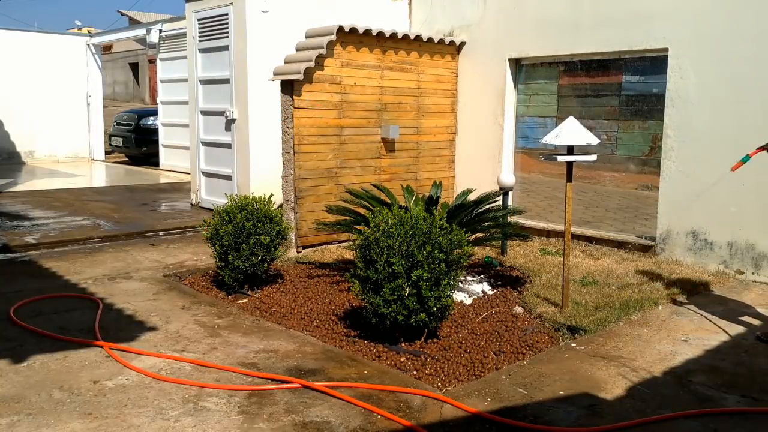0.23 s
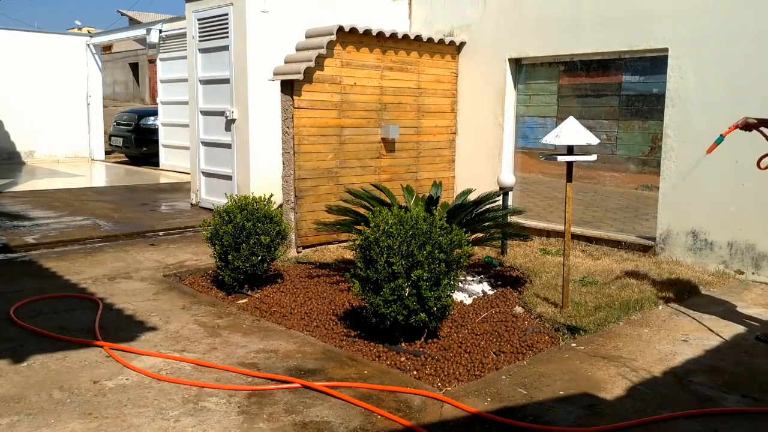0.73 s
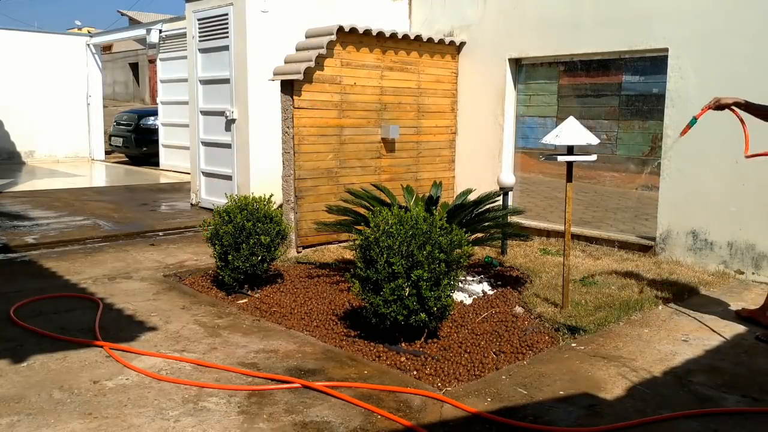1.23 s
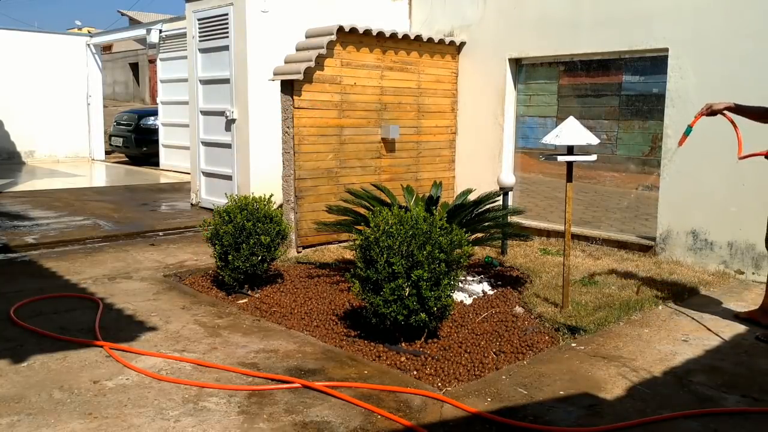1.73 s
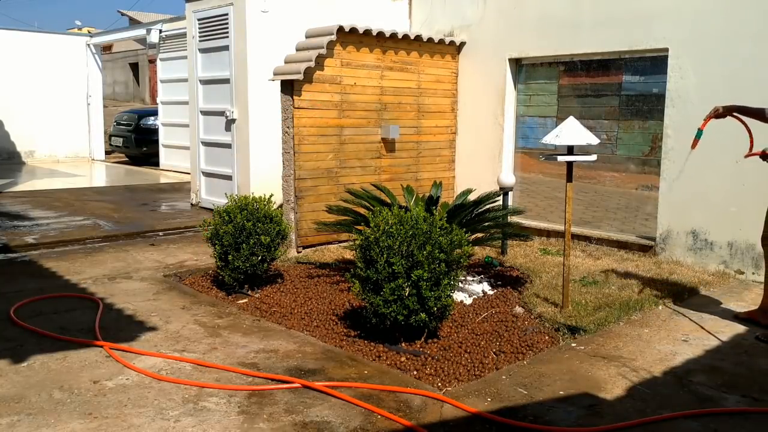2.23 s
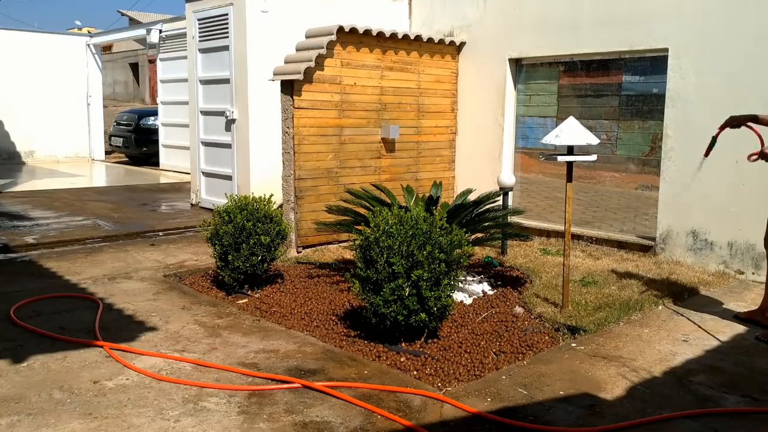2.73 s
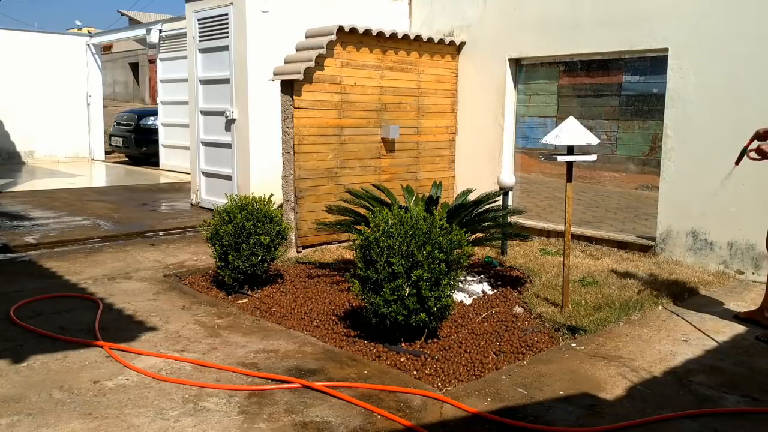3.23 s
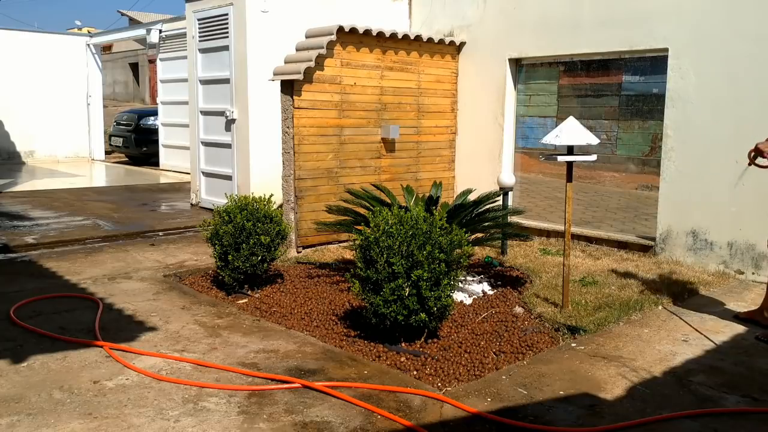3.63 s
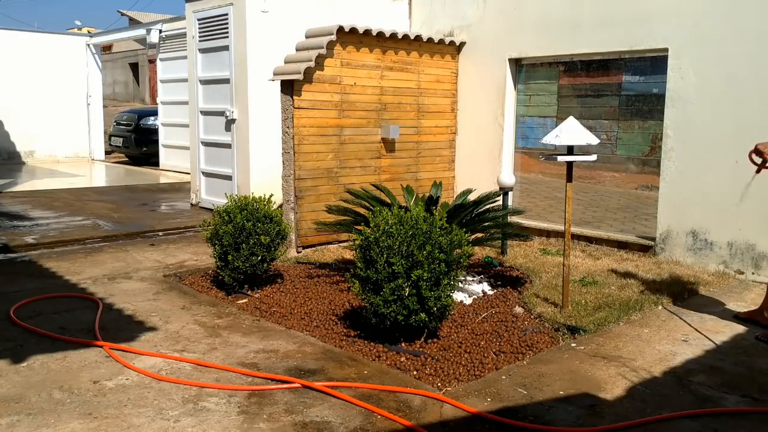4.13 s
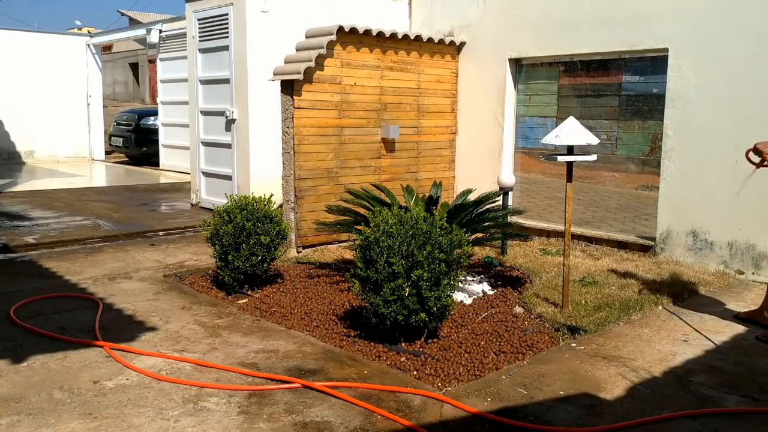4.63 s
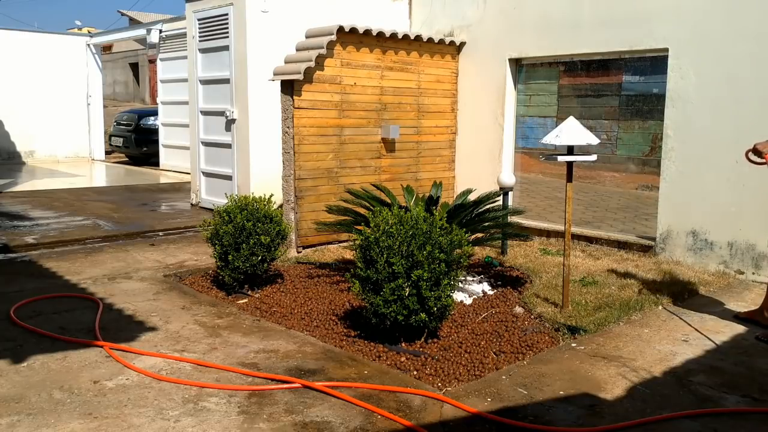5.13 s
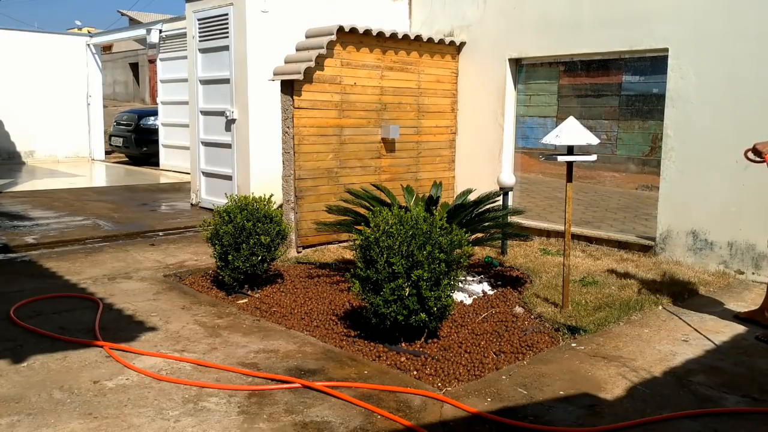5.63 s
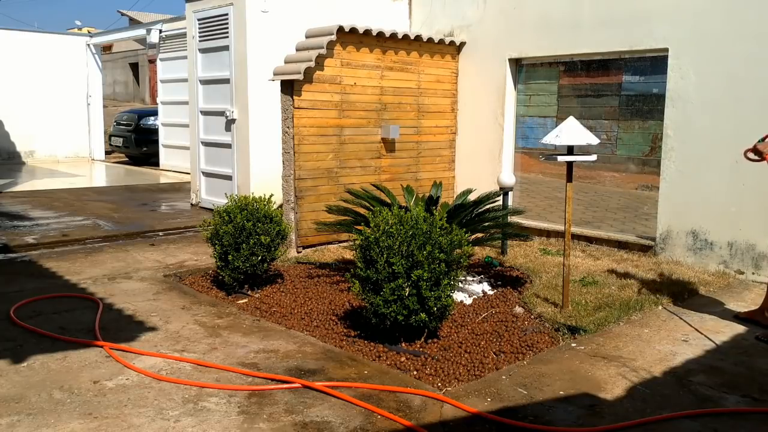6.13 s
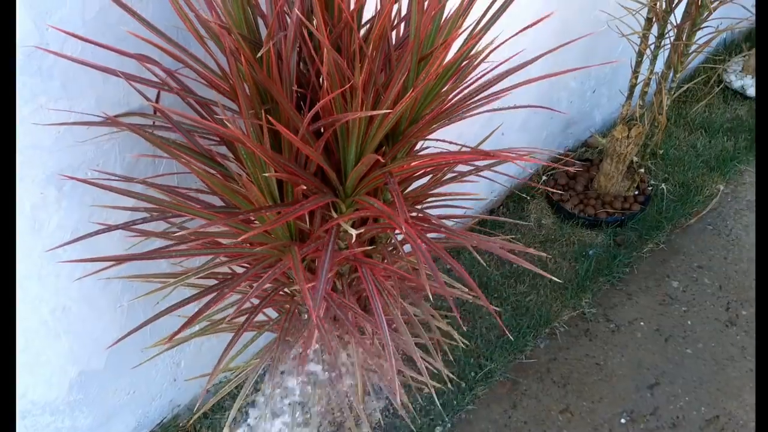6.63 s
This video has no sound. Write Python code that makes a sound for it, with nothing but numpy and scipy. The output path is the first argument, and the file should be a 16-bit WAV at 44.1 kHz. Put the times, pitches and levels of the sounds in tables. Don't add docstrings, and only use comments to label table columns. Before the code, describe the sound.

An outdoor walled garden heard in stereo. From 0 s a hose held nearby sprays fine drops onto soil and leaves, a steady soft hiss that flutters slightly, over a low uneven rumble of far traffic. A distant bird gives a falling call at the start and a few faint peeps follow. Around 0.7 to 1.5 s a puff of wind softly buffets the microphone. From 1.0 s a close sparrow chirps in bursts roughly every 0.6 s, until about 6.2 s: a hoarse high lead-in, then rapid leaping, arching and rising whistles around 3.5 to 6 kHz, loudest between 1.7 and 4 s, with close echoes and a short ring from the walls. Later bursts have fewer notes. At 6.43 s everything cuts to silence for a third of a second. At 6.77 s a close water jet abruptly starts, louder, brighter and coarser, splashing into a plant until the end.

```python
import sys
import numpy as np
from scipy import signal
from scipy.fft import rfft, irfft, next_fast_len
from scipy.io import wavfile
from scipy.ndimage import uniform_filter1d, map_coordinates

SR = 44100
rng = np.random.default_rng(int(sys.argv[2]) if len(sys.argv) > 2 else 0)


def amplitude_ratio(level_db):
    exponent = np.asarray(level_db, float) / 20
    return 10 ** exponent


def persist_wave(psi):
    counts = np.round(np.clip(psi, -1, 1) * 32767).astype(np.int16)
    wavfile.write(sys.argv[1], SR, np.atleast_2d(counts).T)


N = 302967
CUT_S, BACK_S = 6.427, 6.769


def unit(x):
    return x / np.sqrt(np.mean(x ** 2) + 1e-20)


def along(points, hz):
    f, v = np.transpose(points)
    return np.interp(np.log(hz + 1), np.log(f + 1), v)


def level(rows):
    s, db = np.transpose(rows)
    return amplitude_ratio(np.interp(np.arange(N) / SR, s, db))


def wobble(rate, size=N):
    knots = rng.standard_normal(int(size * rate / SR) + 4)
    return map_coordinates(knots, [np.arange(size) * rate / SR])


def filtered(x, response):
    m = next_fast_len(N + 8192)
    return irfft(rfft(x, m) * response(np.fft.rfftfreq(m, 1 / SR)), m)[..., :N]


# (frequency [Hz], correlation [-1 to 1])
GARDEN_ALIKE = [(60, 0.89), (180, 0.54), (540, 0.27), (1610, -0.3), (4830, 0.031), (14400, -0.05)]


def rush(spectrum, patchy_db, drops=0, alike=GARDEN_ALIKE):
    z = signal.stft(rng.standard_normal((2, N)), nperseg=512)[2]
    field = uniform_filter1d(rng.standard_normal(z.shape[1:]), size=6, axis=0)
    field = uniform_filter1d(field, size=12, axis=1)
    pair = signal.istft(z * amplitude_ratio(patchy_db * unit(field)), nperseg=512)[1][:, :N] + drops

    def color(hz):
        turn = np.arccos(np.clip(along(alike, hz), -1, 1)) / 2
        return amplitude_ratio(along(spectrum, hz)) * [np.cos(turn), np.sin(turn)]

    mid, side = filtered(pair, color)
    return unit(np.array([mid + side, mid - side]))


def patter(rate, scatter_db, t60):
    lands = rng.random(N) < rate / SR
    sizes = lands * amplitude_ratio(scatter_db * np.minimum(rng.exponential(size=N), 4))
    fade = amplitude_ratio(-60 * np.arange(SR // 50) / SR / t60)
    return unit(signal.fftconvolve(sizes, fade)[:N] * rng.standard_normal((2, N)))


# (time [s], level [dB])
SPRAY_FLOW = [(0, -47.5), (.45, -50.5), (.9, -51), (1.25, -48), (1.6, -50), (3.3, -50.5), (4.6, -52),
              (5.3, -52), (6.3, -51)]
# (frequency [Hz], level [dB per Hz])
SPRAY_COLOR = [(180, -34.5), (300, -8), (429, -6), (497, -4.5), (921, -5.5), (1250, -6), (2780, -6),
               (4530, -4.5), (6170, -2.5), (9410, -2.5), (14600, -10)]


def spray():
    drops = patter(rate=720, scatter_db=2.0, t60=0.0065)
    hiss = rush(SPRAY_COLOR, patchy_db=3.0, drops=0.3 * drops)
    return amplitude_ratio(5.0 + 0.2 * wobble(8)) * level(SPRAY_FLOW) * hiss


def pumping(hiss, bird):
    most_db, smooth_s, half_db, corner_hz = 5.5, 0.121, -29.5, 3500
    power = uniform_filter1d(bird ** 2, size=round(smooth_s * SR))
    loud = np.sqrt(np.abs(power))
    lift = amplitude_ratio(most_db * loud / (loud + amplitude_ratio(half_db))) - 1
    return hiss + lift * filtered(hiss, lambda hz: hz ** 4 / (hz ** 4 + corner_hz ** 4))


# (time [s], level [dB])
TOWN_LEVEL = [(0, -49), (.6, -53), (1.1, -54), (1.6, -52), (2.2, -52), (2.7, -51), (3.2, -48), (3.75, -50),
              (4.25, -50), (4.8, -49.5), (5.15, -50), (5.4, -50), (5.9, -52.5), (6.3, -48)]
# (frequency [Hz], level [dB per Hz])
TOWN_COLOR = [(15, -55.5), (25, -34), (42, -10.5), (64, 2.5), (92, -8.5), (124, -5), (150, -11.5),
              (248, -18), (500, -27.5), (650, -48), (1100, -120)]


def town():
    return amplitude_ratio(1.73 + 1.2 * wobble(4)) * level(TOWN_LEVEL) * rush(TOWN_COLOR, patchy_db=-1.0)


FALL = [(0, .55, 0.5), (.35, 1, -5.5), (.75, .2, -3.5), (1, 0, -5)]
PEEP = [(0, 0, -7), (.45, 0.95, -2), (1, .2, -11)]
RASP = [(0, 0, -9), (.55, .6, -3.5), (1, 0.75, -5)]
ARCH = [(0, 0, -6), (.33, .92, -2), (.7, .85, -1.5), (1, 0, -9.5)]
RISE = [(0, 0, -10), (.4, .62, -1), (.75, 1, -4.5), (1, .6, -17)]
LEAP = [(0, 0, -24.5), (.38, .25, -9), (.53, 1, -2), (.66, .9, -3.5), (.85, .8, -2.5), (.93, .2, -9.5),
        (1, .05, -16)]
HOOK = [(0, 0, -17), (.28, .5, -5.5), (.48, 0.91, 0), (.82, 1, -6), (1, .75, -24.5)]
SWING = [(0, 0.096, -19.5), (.3, .12, -6.5), (.5, 1, -4), (.8, .92, -1.5), (.88, .1, -12.5),
         (1, -.4, -21.5)]
# (time [s], length [s], base [Hz], top [Hz], peak level [dB])
FALLS = [
    (0, .062, 2387, 3600, -42.5),
    (0, .02, 4740, 4940, -44),
    (2.863, .037, 3970, 4290, -47.5),
]
PEEPS = [
    (.332, 0.032, 4840, 5050, -45),
    (.397, 0.052, 4000, 4220, -47),
    (1.64, 0.064, 5000, 4850, -49.5),
    (2.785, 0.029, 4900, 5870, -45.5),
    (6.32, 0.04, 4620, 5770, -51),
    (6.392, 0.033, 4170, 4464, -47.5),
]
RASPS = [
    (1.014, 0.036, 6480, 7420, -46.5),
    (1.678, .045, 6760, 7220, -37),
    (2.354, 0.077, 6380, 7380, -39),
    (3.003, .052, 6250, 6300, -39),
    (3.55, 0.056, 6405, 5860, -36.5),
    (4.102, 0.044, 6300, 5970, -38),
    (4.682, 0.046, 6340, 6040, -39),
    (5.293, 0.052, 5920, 5740, -36),
    (5.419, 0.085, 6430, 6950, -38),
    (5.96, 0.047, 6440, 5750, -38.5),
]
ARCHES = [
    (1.052, 0.058, 4450, 5390, -31),
    (1.18, 0.064, 3940, 5530, -29),
    (1.785, 0.075, 4100, 5705, -22.5),
    (2.392, 0.093, 4180, 5446, -23),
    (3.135, 0.071, 4150, 5490, -23),
    (3.657, .077, 4174, 5770, -27.5),
]
RISES = [
    (1.124, 0.058, 3800, 4640, -29),
    (1.268, 0.04, 3400, 4677, -23.5),
    (1.813, 0.037, 3650, 4610, -27.5),
    (2.508, 0.044, 3910, 5050, -21.5),
    (2.535, 0.042, 3700, 5200, -21.5),
    (3.142, 0.045, 3700, 4826, -24.5),
    (3.682, 0.045, 3540, 5150, -21.5),
]
LEAPS = [
    (1.688, 0.099, 3544, 5800, -21),
    (2.425, 0.088, 3655, 5810, -22),
    (3.023, .1, 3697, 5673, -19.5),
    (3.567, 0.098, 3587, 5844, -18.5),
]
HOOKS = [
    (1.88, 0.061, 3440, 4970, -26.5),
    (3.233, 0.049, 3720, 4925, -21),
    (3.752, .058, 3800, 4930, -26),
    (4.252, .056, 3740, 4920, -26.5),
    (4.828, .062, 3620, 4700, -28.5),
    (5.442, 0.065, 3600, 4830, -25.5),
    (6.107, 0.061, 3700, 4710, -28),
]
SWINGS = [
    (4.129, 0.097, 4220, 5554, -22),
    (4.709, 0.096, 4236, 5370, -23.5),
    (5.332, .09, 4160, 5420, -22.5),
    (5.999, .078, 4390, 5420, -21),
]


def whistles():
    kinds = [(RASP, RASPS), (LEAP, LEAPS), (SWING, SWINGS), (ARCH, ARCHES),
             (RISE, RISES), (HOOK, HOOKS), (PEEP, PEEPS), (FALL, FALLS)]
    return [[(s + u * length, base + h * (top - base), db + under) for u, h, under in shape]
            for shape, rows in kinds for s, length, base, top, db in rows]


# (multiple, level [dB])
OVERTONES = [(2, -21.5), (3, -27.5)]
# (frequency [Hz], level [dB per Hz])
BREATH = [(2500, -18), (3500, 0), (5500, 3), (7500, -6.5), (11000, -8.5), (14500, -23)]


def sparrow():
    beat_hz, hoarse_from_hz = 423.3, 5750
    song, effort = np.zeros(N + SR), np.zeros(N + SR)
    for note in whistles():
        s, hz, db = np.transpose(note)
        hoarse = hz[0] > hoarse_from_hz
        rise_s = .025 if hoarse else .004
        t = np.arange(max(s[0] - rise_s, 0), s[-1] + 0.0045, 1 / SR)
        tremble = (.09 if hoarse else .025) * wobble(900 if hoarse else 300, size=len(t))
        pitch = uniform_filter1d(np.interp(t, s, hz), size=110)
        phase = 2 * np.pi * np.cumsum(pitch * (1 + tremble)) / SR
        height = (pitch - 4500) / 1000
        beat = beat_hz * (1 + .15 * wobble(60, size=len(t)))
        second_pitch = pitch * (1 + hoarse * tremble[::-1]) + beat
        second_phase = 2 * np.pi * np.cumsum(second_pitch) / SR
        tone = np.sin(phase) + amplitude_ratio(np.clip(-13 + 8 * height, -30, -3)) * np.sin(second_phase)
        strength = np.interp(t, s, db)
        pinch = -3 * height - 0.35 * np.clip(strength + 26, -20, 5)
        tone += sum(amplitude_ratio(d + pinch) * np.sin(k * phase) for k, d in OVERTONES)
        edge = np.clip(np.minimum((t - t[0]) / rise_s, (t[-1] - t) / 0.0036), 0, 1)
        size = amplitude_ratio(strength + 3.24 * wobble(307.3, size=len(t))) * edge
        start = round(t[0] * SR)
        song[start:][:len(t)] += size * tone
        effort[start:][:len(t)] += size * amplitude_ratio(-5 if hoarse else -19.5 + pinch)
    air = unit(filtered(rng.standard_normal(N), lambda hz: amplitude_ratio(along(BREATH, hz))))
    return song[:N] + effort[:N] * air


# (delay [s], level [dB], left lead [s])
ECHOES = [
    (.002, -4.5, .00012),
    (.0033, 2, -.0001),
    (.0053, 3.5, .00024),
    (.008, -1, .00031),
    (.0092, -16, -.00018),
    (0.018, -9, .00021),
    (.025, -10, -.00026),
]


def perch(bird):
    paths = [(0.00084, 0.0077, 0.00026)] + ECHOES

    def path(hz, s, db):
        return amplitude_ratio(db) * np.exp(-2j * np.pi * hz * s)

    def ports(hz):
        return sum(np.array([path(hz, s - lead / 2, db), path(hz, s + lead / 2, db)]) for s, db, lead in paths)

    return filtered(bird, ports) * amplitude_ratio([[-1.4], [-2.2]])


# (frequency [Hz], t60 [s])
WALLS_T60 = [(2000, 0.82), (5000, 0.26), (12000, 0.76)]


def walls(x):
    hz, t, z = signal.stft(rng.standard_normal((2, SR * 2 // 3)), SR, nperseg=256)
    decay = amplitude_ratio(-60 * t / along(WALLS_T60, hz)[:, None])
    tail = signal.istft(z * decay, SR, nperseg=256)[1]
    late = np.pad(x, (500, 0))[None]
    return signal.fftconvolve(late, tail / np.linalg.norm(tail[0]), axes=1)[:, :N]


# (time [s], hold [s], level [dB])
GUSTS = [
    (.82, .1, -54.5),
    (1.02, 0.13, -51.5),
    (1.32, 0.14, -51),
]
# (frequency [Hz], level [dB per Hz])
BUFFET_COLOR = [(60, -10.5), (120, 1), (300, -7), (900, -13.5), (2000, -21.5)]


def wind():
    rise_s, fall_s = 0.18, .1
    t = np.arange(N) / SR
    blow = np.zeros(N)
    for s, hold, db in GUSTS:
        swell = np.minimum(1 + (t - s) / rise_s, 1 + (s + hold - t) / fall_s)
        blow += amplitude_ratio(db) * np.clip(swell, 0, 1) ** 2
    return blow * amplitude_ratio(5.5 + 2.7 * wobble(24.92)) * rush(BUFFET_COLOR, patchy_db=0.0)


# (frequency [Hz], level [dB per Hz])
JET_COLOR = [(40, -11), (200, -10.5), (667, -14.5), (1600, -7.5), (3080, -13.5), (6200, -9.5), (8910, -1),
             (14600, -13)]
# (frequency [Hz], correlation [-1 to 1])
JET_ALIKE = [(60, 0.79), (240, 0.94), (930, 0.38), (3670, -0.29), (14400, 0.2)]


def jet():
    drops = patter(rate=1800, scatter_db=1.5, t60=0.0021)
    splash = rush(JET_COLOR, patchy_db=2.0, drops=0.5 * drops, alike=JET_ALIKE)
    return amplitude_ratio(-26.5 + 0.52 * wobble(27)) * splash


def scene():
    t = np.arange(N) / SR
    bird = sparrow()
    garden = perch(bird) + amplitude_ratio(-1.0) * walls(bird) + pumping(spray(), bird) + town() + wind()
    garden_fade = amplitude_ratio(-60 * np.clip(t - CUT_S, 0, 1) / 0.0055)
    jet_rise = np.clip((t - BACK_S) / 0.0012, 0, 1)
    return garden * garden_fade + jet() * jet_rise


def low_pass(x):
    return signal.sosfilt(signal.butter(12, 15050, fs=SR, output="sos"), x)


# (frequency [Hz], left minus right [dB])
PORT_TILT = [(60, 1.5), (150, 3), (370, 2), (930, 0.5), (2320, -0.5), (5790, -1), (14400, 1.5)]


def record(dry):
    top_hz = 14300

    def ports(hz):
        half = along(PORT_TILT, hz) / 2
        return (hz < top_hz) * amplitude_ratio([half, -half])

    t = np.arange(N) / SR
    running = (t < CUT_S + .03) | (t > BACK_S - .002)
    mix = filtered(dry, ports) * running
    return low_pass(mix)


dry = scene()
out = record(dry)
persist_wave(out)
```